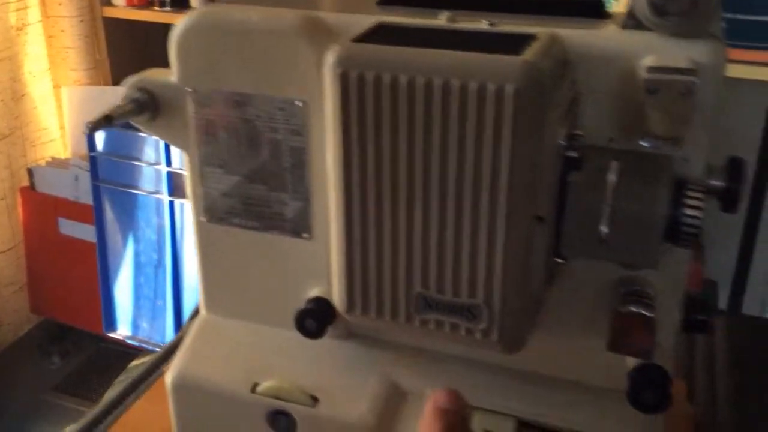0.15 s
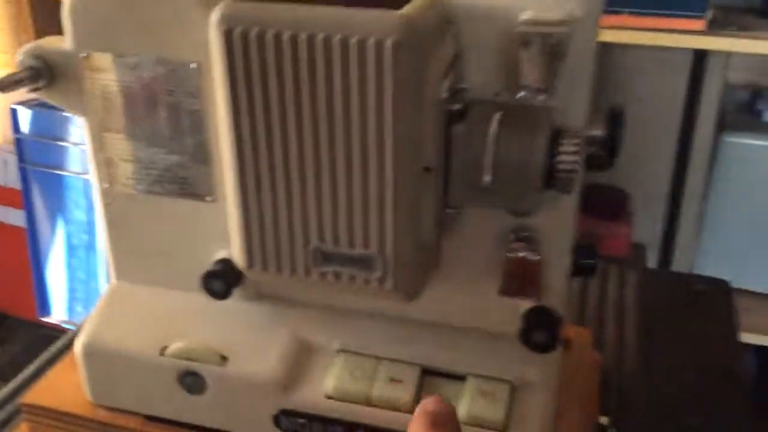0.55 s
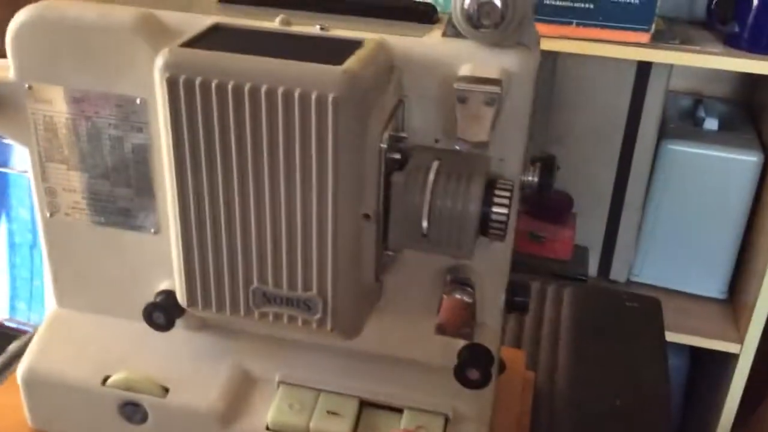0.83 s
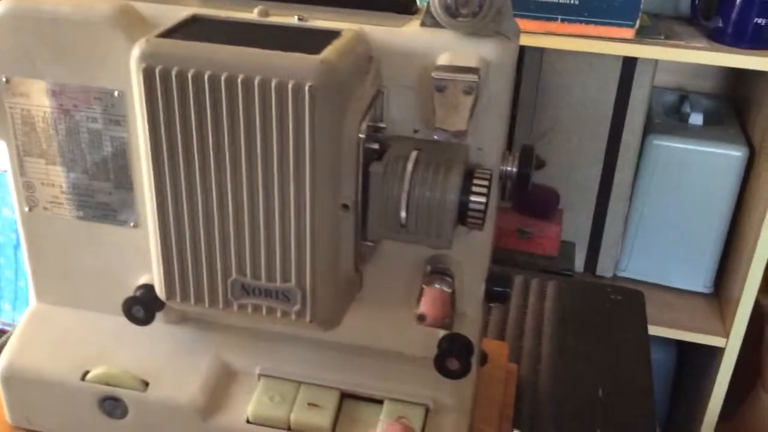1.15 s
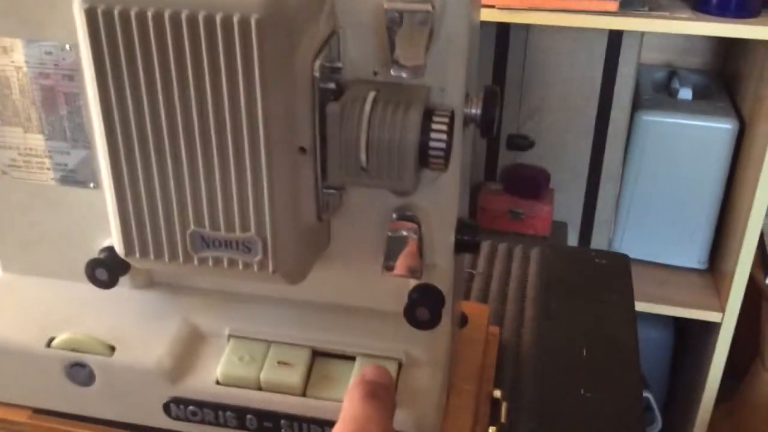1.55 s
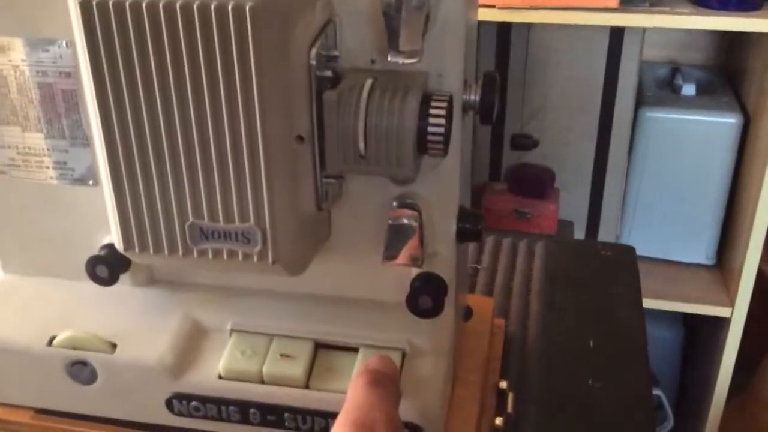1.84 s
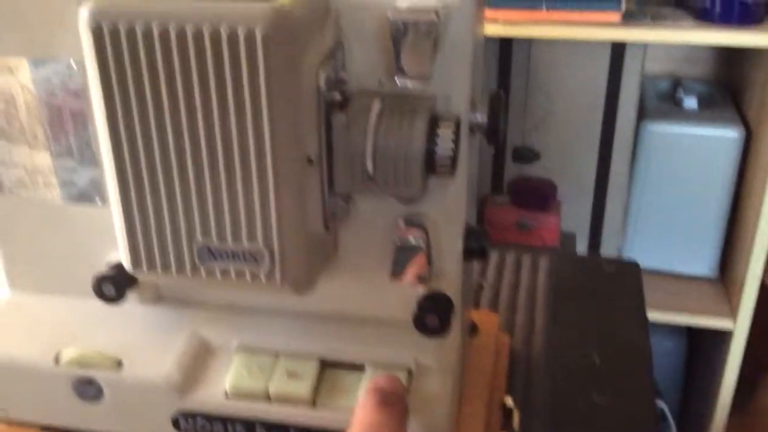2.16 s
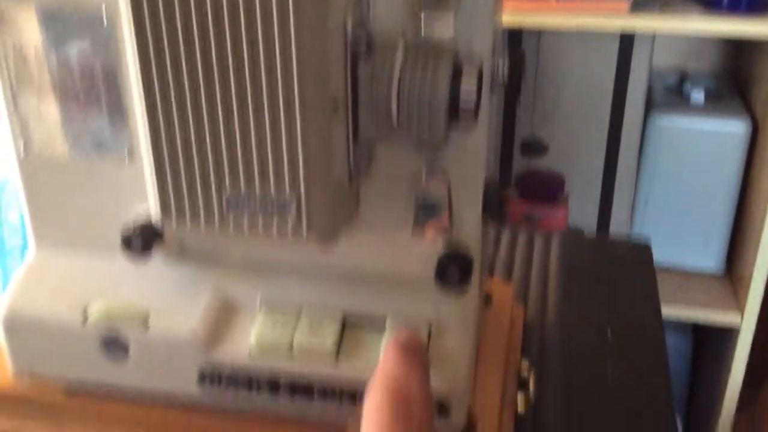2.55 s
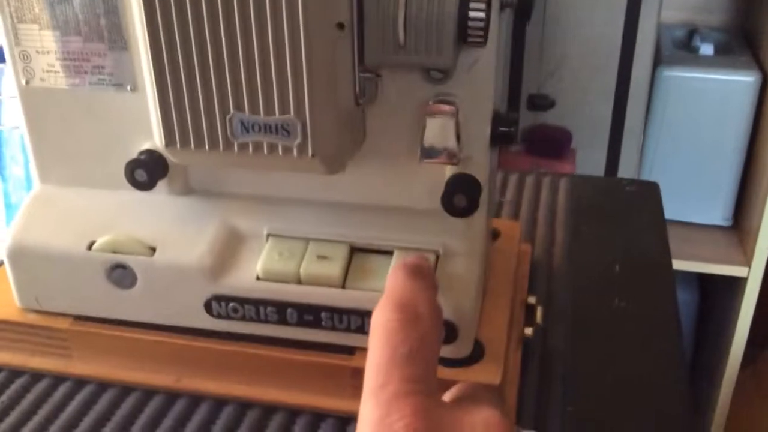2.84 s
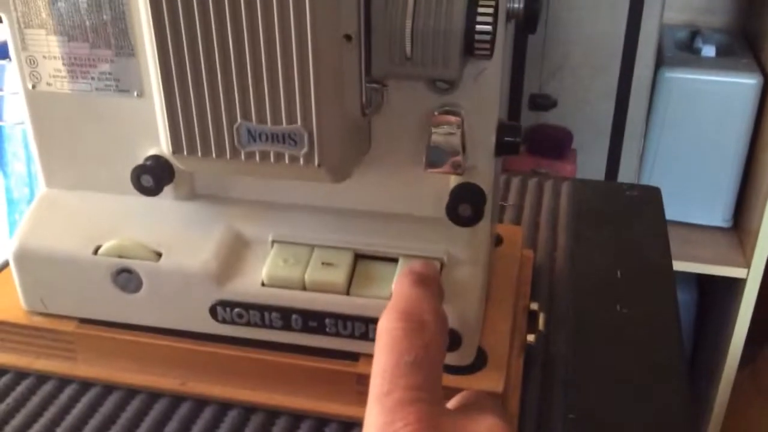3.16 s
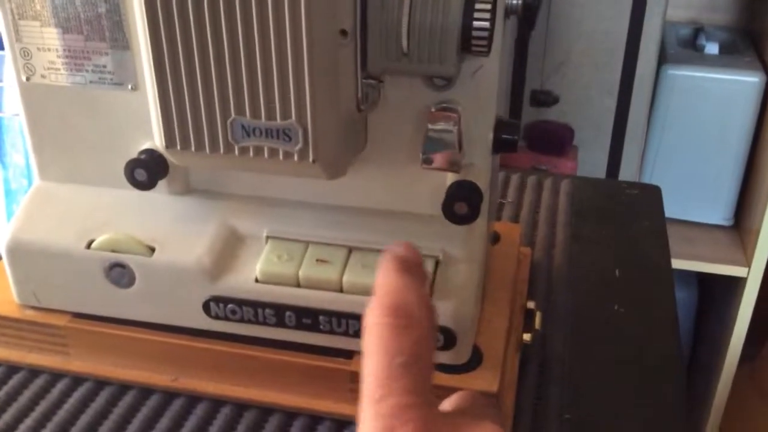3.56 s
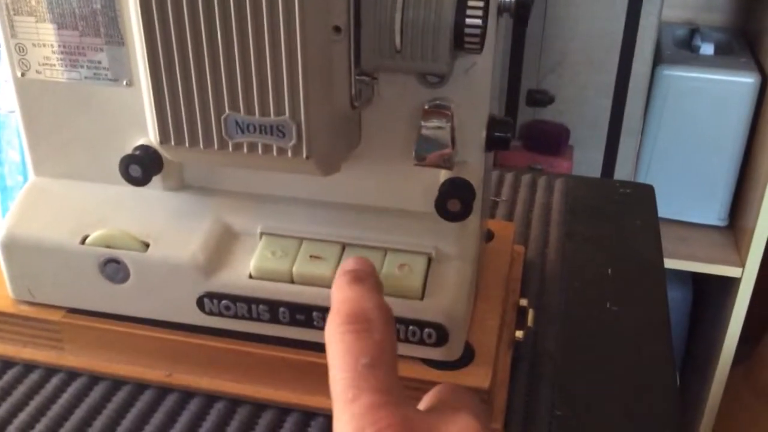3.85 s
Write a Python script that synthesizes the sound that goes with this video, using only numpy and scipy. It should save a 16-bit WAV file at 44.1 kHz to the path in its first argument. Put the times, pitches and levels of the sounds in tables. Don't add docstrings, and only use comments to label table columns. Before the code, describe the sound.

Projector mechanism purrs in rapid ringing pulses over whine and hiss, then clacks off into quiet

```python
import sys
import numpy as np
from scipy import signal
from scipy.fft import rfft, irfft
from scipy.io import wavfile
from scipy.ndimage import uniform_filter1d

SR = 44100
rng = np.random.default_rng(int(sys.argv[2]) if len(sys.argv) > 2 else 0)


def gain_from_db(level_db):
    decades = np.asarray(level_db, float) / 20
    return 10 ** decades


def put_to_file(sound):
    columns = np.atleast_2d(sound).T
    safe = np.clip(columns, -1, 1)
    whole_steps = np.round(safe * 32767)
    wavfile.write(sys.argv[1], SR, whole_steps.astype(np.int16))


N = 176400

STOP_S, GEAR_COAST_S = 3.368, 0.03
STEADY_TOP_HZ = 15680


def level(x, db):
    return x * gain_from_db(db) / np.sqrt(np.mean(x ** 2))


def line(table, x):
    return np.interp(x, *np.array(table, float).T)


def band(x, hz, width_hz):
    return signal.lfilter(*signal.iirpeak(min(hz, 19000), hz / width_hz, fs=SR), x)


def cut(x, hz):
    return signal.sosfilt(signal.ellip(10, 0.3, 70, hz, fs=SR, output="sos"), x)


def walk(rate):
    k = int(SR / rate)
    steps = np.repeat(rng.standard_normal(N // k + 1), k)
    x = uniform_filter1d(uniform_filter1d(steps, k), k)[:N]
    return x / x.std()


def coloured(x, table, peaks=()):
    f = np.arange(N // 2 + 1) * SR / N + 1
    hz, spectrum_db = np.array(table).T
    db = np.interp(np.log(f), np.log(hz), spectrum_db, left=-60)
    for hz, width_hz, boost_db in peaks:
        db = db + boost_db / (1 + (2 * (f - hz) / width_hz) ** 2)
    return irfft(rfft(x) * gain_from_db(db), N)


# start_s, speed_turns_per_s
SPEED = [(0.0, 13.61), (0.12, 15.312), (0.25, 16.91), (0.45, 17.251), (0.7, 17.881), (0.9, 18.07),
         (1.15, 17.758), (1.4, 18.118), (1.6, 18.393), (1.8, 18.292), (1.95, 17.753), (2.15, 17.962),
         (2.35, 18.476), (2.52, 18.342), (2.68, 18.042), (2.9, 18.234), (3.1, 18.321), (3.36, 18.464)]
START_TURN = -0.396


def cam_shaft(t):
    speed = line(SPEED, t)
    return speed, START_TURN + np.cumsum(speed) / SR


# start_s, level_db
EFFORT = [(0, -16.5), (.2, -5.5), (.45, -0.5), (1.2, -1.5), (1.6, -2), (2.4, -1.5), (3.36, -3.5)]
# pitch_per_cam_speed, centre_turns, width_turns, level_db, scatter_0_to_1
CLAW = [
    (30.18, -.012, 0.096, -29.5, .12),
    (28.5, -.27, 0.069, -43.5, 0.2),
    (30.05, .2, 0.039, -46.5, 0.7),
    (22.18, .06, 0.22, -47, 0.44),
    (50, -0.0095, 0.053, -43, 0.5),
    (57.7, 0.11, 0.031, -45, 0.3),
    (181, -0.62, 0.015, -56, .95),
    (185, -0.026, 0.033, -61, .95),
]
RISE_SHARE = 0.75
BODY_HOLD = 0.53
PITCH_SCATTER = 0.064


def claw(t, turns, speed):
    out = 0
    for multiple, centre, width, db, scatter in CLAW:
        turn = np.round(turns - centre)
        p = turns - centre - turn
        size, slip, pitch = rng.standard_normal((80, 3))[turn.astype(int) + 1].T
        shape = np.exp(-0.5 * (p / (width * np.where(p < 0, RISE_SHARE, 1))) ** 2)
        held = (speed[-1] / speed) ** BODY_HOLD
        cycles = multiple * held * (1 + PITCH_SCATTER * scatter ** 2 * pitch) * p
        ring = np.cos(2 * np.pi * cycles + 4 * scatter ** 2 * slip)
        out = out + gain_from_db(db + 4 * scatter * size) * shape * ring
    return out * gain_from_db(line(EFFORT, t))


# motor_multiple, level_db, wobble_db, swell_per_cam_turn_0_to_1
WHINE = [
    (1, -58, 0.5, .2),
    (2, -57.5, -3.5, 0),
    (3, -65.5, 1, .3),
    (4, -62, 2.5, 0.6),
]
MOTOR_RATIO = 14.5
HOUSING_HZ, HOUSING_WIDTH_HZ, HOUSING_DB = 242, 8, 11


def whine(turns, speed):
    out = 0
    for k, db, wobble_db, swell in WHINE:
        hz = k * MOTOR_RATIO * speed
        lift = HOUSING_DB / (1 + ((hz - HOUSING_HZ) / HOUSING_WIDTH_HZ) ** 2)
        slow_loss = (k > 1) * 2.5 * (speed[-1] - speed)
        size = gain_from_db(db + 4.5 + lift - slow_loss + wobble_db * walk(10))
        swelling = 1 + swell * np.cos(2 * np.pi * turns)
        phase = 2 * np.pi * k * MOTOR_RATIO * turns + 0.067 * k * walk(10)
        out = out + size * swelling * np.sin(phase)
    return out


BUZZ_HZ, BUZZ_DB, BUZZ_ROUGH_DB = 199.6, -56.5, 3
BUZZ_START_DB, BUZZ_SETTLE_S = 12, 0.19


def buzz(t):
    db = BUZZ_DB + BUZZ_START_DB * np.exp(-t / BUZZ_SETTLE_S) + BUZZ_ROUGH_DB * walk(10)
    return gain_from_db(db) * np.sin(2 * np.pi * BUZZ_HZ * t + 0.4 * walk(5.9))


PATCH_DB, PATCH_RATE = 1.2, 6


def patchy(x):
    spec = rfft(x)
    octave = np.log2(np.arange(N // 2 + 1) * SR / N + 1)
    out = 0
    for centre in np.arange(6, 14.5, 0.125):
        part = irfft(spec * np.clip(1 - 8 * abs(octave - centre), 0, 1), N)
        out = out + part * gain_from_db(PATCH_DB * walk(PATCH_RATE))
    return out


RIPPLE_DB, RIPPLE_HZ = 2, 35


def ripple(x):
    k = int(RIPPLE_HZ * N / SR)
    db = uniform_filter1d(uniform_filter1d(rng.standard_normal(N // 2 + 1), k), k)
    return irfft(rfft(x) * gain_from_db(RIPPLE_DB * db / db.std()), N)


FAN_COAST_S, FAN_REST_S, FAN_FADE_S = 0.18, 3.56, 0.012


def fan(t):
    coast = np.maximum(t - STOP_S, 0) / FAN_COAST_S
    rest = np.maximum(t - FAN_REST_S, 0) / FAN_FADE_S
    return np.exp(-coast - rest)


# pitch_hz, level_db_per_hz
HISS = [(71, -53), (120, -24.5), (261, -8), (327, -23), (557, -3.5), (670, -13.5), (892, -21.5),
        (1400, -20), (16000, -29)]
# pitch_hz, width_hz, boost_db
CASE = [(212, 48, 3.5), (410, 40, 5), (550, 70, 3.5), (801, 14, 5.5), (912, 140, 11.5), (1128, 220, 10),
        (1692, 32, 7.5), (2003, 450, 7.5), (3250, 780, 4.5), (4250, 35, 0), (5640, 300, 3),
        (6780, 2900, -5), (8730, 290, 5.5), (9920, 350, 7), (13400, 5100, 2)]
HISS_DB, FLICKER_DB, GRIT_DB = -48, 0.5, -0.5
RUNUP_DB, RUNUP_S = 1, 0.075


def hiss(t):
    grit = rng.standard_normal(N) * gain_from_db(GRIT_DB * walk(1500) + FLICKER_DB * walk(60))
    x = level(ripple(patchy(coloured(grit, HISS, CASE))), HISS_DB)
    low = signal.sosfilt(signal.butter(2, 1300, fs=SR, output="sos"), x)
    air = (x - low) * gain_from_db(RUNUP_DB * np.exp(-t / RUNUP_S))
    gears = 0.78 + 0.65 * np.exp(-np.maximum(t - STOP_S, 0) / GEAR_COAST_S)
    return fan(t) * (air + low * gears)


# pitch_hz, level_db_per_hz
ROOM = [(15, -54.5), (25, -30), (48, -4), (97, -6.5), (145, -6.5), (427, -18.5), (1500, -23.5), (3500, -47)]
ROOM_DB, DUCK_DB, DUCK_RECOVER_S = -58.5, -3.5, 0.11


def room_tone(t):
    tone = level(coloured(rng.standard_normal(N) * gain_from_db(1.12 * walk(9)), ROOM), ROOM_DB)
    recovery = np.exp(-(np.maximum(t - STOP_S, 0) / DUCK_RECOVER_S) ** 2)
    return tone * gain_from_db(DUCK_DB * (t > STOP_S) * recovery)


# pitch_hz, width_hz, level_db
LATCH = [(1247, 135, 10.5), (1670, 55, 5), (3530, 140, -1.5), (4830, 260, -7), (7900, 280, -31)]
STOP = [(251, 25, -5), (425, 42, -9.5), (555, 70, 4), (1250, 360, -8.5), (1690, 86, -1.5), (1944, 150, 3),
        (3294, 220, -8), (5390, 250, -4.5), (7800, 500, -13), (10760, 170, 2), (11900, 1000, -9),
        (13400, 600, -16)]
SPRING = [(550, 150, -12), (1650, 120, -5), (3050, 230, -3.5), (4000, 220, -5), (5500, 340, -2),
          (6750, 200, -9.5), (8700, 600, -3), (12970, 900, -13.5)]
REBOUND = [(216, 19, 13.5), (520, 220, 1.5), (815, 140, -11), (1580, 140, -1), (2180, 110, -14),
           (2770, 190, -7.5), (4130, 180, -14), (5800, 300, -32)]
CREAK = [(3950, 98, 6.5), (5900, 400, -7)]
SLIDE = [(3450, 120, 1), (2970, 150, -1), (5300, 500, -7)]
BROAD_DB = [
    -13,
    -12.5,
    -8.5,
    -19,
    -32,
    -18,
]
# start_s, level_db, crack_ms, tail_db, tail_t60_s
KEYS = [(0.073, -28.5, 1.3, -12, 0.15), (.1, -48, 15, 2, 0.44), (0.192, -50, 5.4, -5, 0.074),
        (3.353, -39.5, 5.6, 3, .2), (3.365, -37, 0.56, -13, 0.093), (3.3673, -11, 1.35, -8, 0.14),
        (3.4992, -23, 0.57, -10, 0.14), (3.529, -39, 2.5, -10, 0.12), (3.5419, -28.5, 3, -9.5, 0.2),
        (3.617, -57.5, 1.5, -7, 0.11), (3.683, -67.5, 1.3, -11, .05)]
KEY_KIND = [0, 5, 0, 4, 2, 1, 2, 2, 3, 2, 2]
CRACK_WIDEN, TAIL_WIDEN = 2.22, 2.05
BROAD_HZ, BROAD_TOP_HZ, KEY_BASS_HZ, TAIL_TOP_HZ = 598, 11000, 160, 15000


def keys():
    out = np.zeros(N + SR)
    s = np.arange(SR // 2) / SR
    colours = (LATCH, STOP, SPRING, REBOUND, CREAK, SLIDE)
    broad = signal.butter(1, [BROAD_HZ, BROAD_TOP_HZ], "band", fs=SR, output="sos")
    for (at, db, crack_ms, tail_db, t60), kind in zip(KEYS, KEY_KIND):
        hit, rattle = rng.standard_normal((2, len(s)))
        if kind != 1:
            hit = cut(hit, STEADY_TOP_HZ)
        age = s * 1000 / crack_ms
        crack = hit * age * np.exp(1 - age)
        tail = cut(rattle, TAIL_TOP_HZ) * gain_from_db(tail_db - 60 * s / t60) * (1 - np.exp(-age))
        ring = gain_from_db(BROAD_DB[kind]) * signal.sosfilt(broad, crack + tail)
        for hz, width_hz, peak_db in colours[kind]:
            crack_ring = band(crack, hz, CRACK_WIDEN * width_hz)
            tail_ring = 1.46 * band(tail, hz, TAIL_WIDEN * width_hz)
            ring = ring + gain_from_db(peak_db) * (crack_ring + tail_ring)
        i = int(at * SR)
        out[i:i + len(s)] += ring * gain_from_db(db + 3)
    return signal.sosfilt(signal.butter(2, KEY_BASS_HZ, "high", fs=SR, output="sos"), out[:N])


GEAR_RUN_ON_S = 0.015


def scene():
    t = np.arange(N) / SR
    speed, turns = cam_shaft(t)
    geared = np.exp(-np.maximum(t - STOP_S - GEAR_RUN_ON_S, 0) / GEAR_COAST_S)
    machine = geared * (claw(t, turns, speed) + whine(turns, speed) + buzz(t))
    steady = cut(hiss(t) + room_tone(t), STEADY_TOP_HZ)
    return (machine + keys() + steady)[None]


# pitch_hz, level_db_per_hz
SELF_NOISE = [(1500, -10.5), (3000, 2), (6500, -7), (10000, -3), (16000, -5.5)]
SELF_NOISE_DB = -79


def microphone_hiss():
    return cut(level(coloured(rng.standard_normal(N), SELF_NOISE), SELF_NOISE_DB), STEADY_TOP_HZ)


def band_limit(x):
    return signal.sosfilt(signal.butter(12, 17010, fs=SR, output="sos"), x)


def record(dry):
    mix = cut(dry + microphone_hiss(), 16800)
    return band_limit(mix)


dry = scene()
out = record(dry)
put_to_file(out)
```